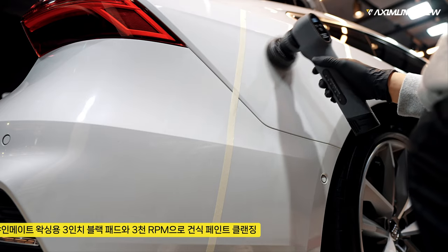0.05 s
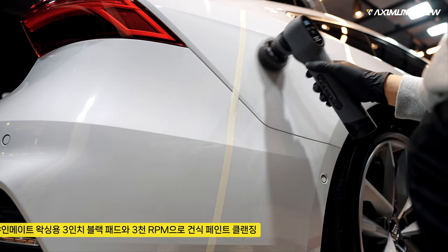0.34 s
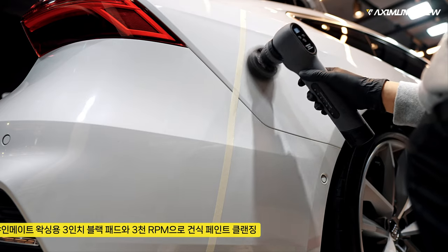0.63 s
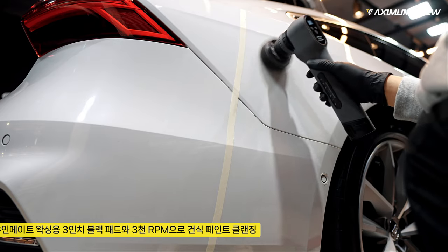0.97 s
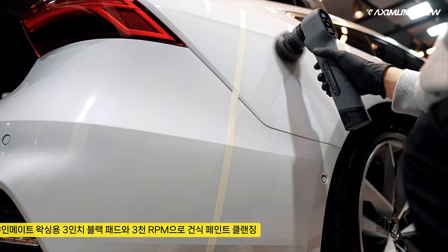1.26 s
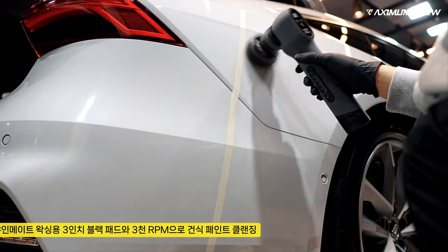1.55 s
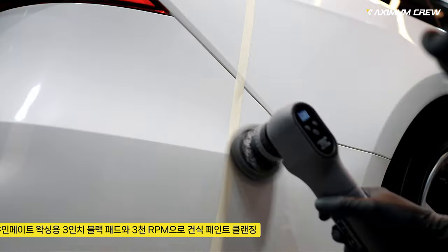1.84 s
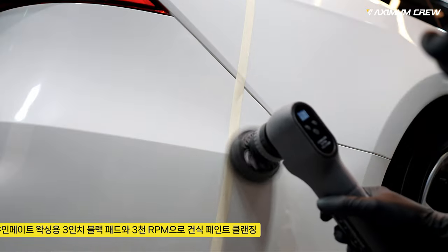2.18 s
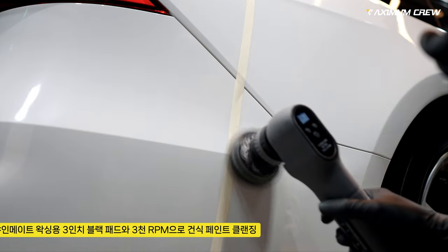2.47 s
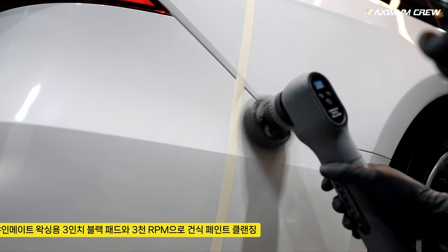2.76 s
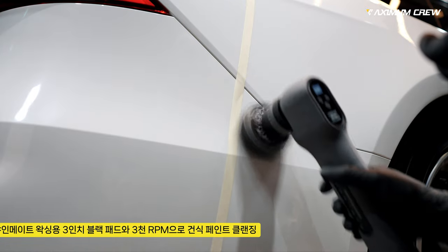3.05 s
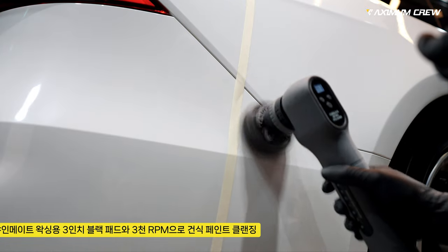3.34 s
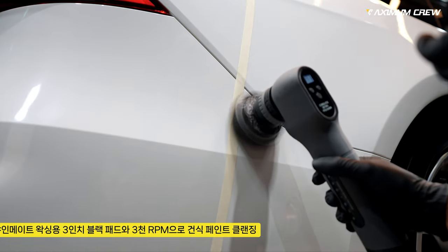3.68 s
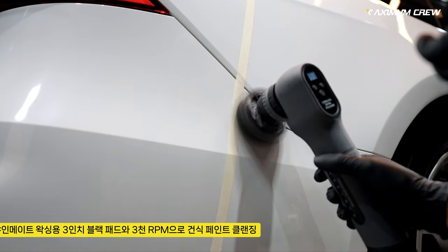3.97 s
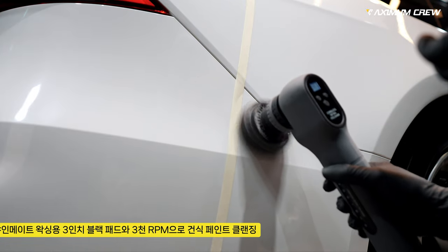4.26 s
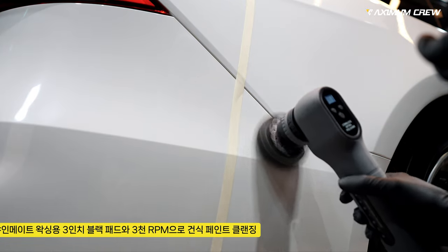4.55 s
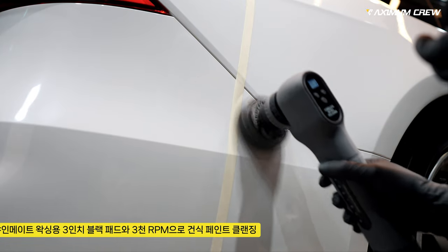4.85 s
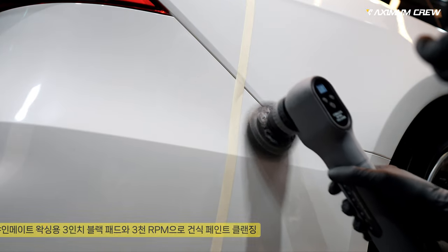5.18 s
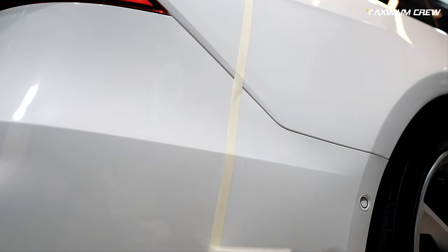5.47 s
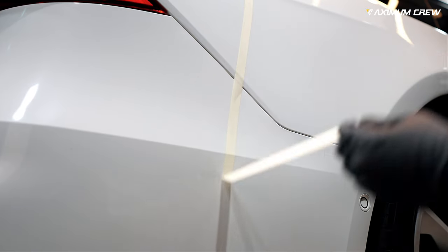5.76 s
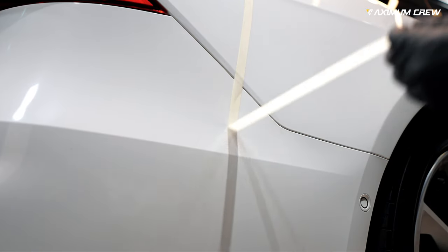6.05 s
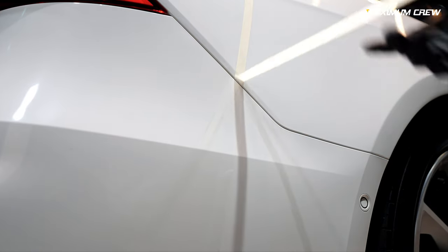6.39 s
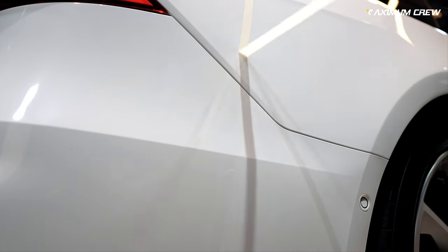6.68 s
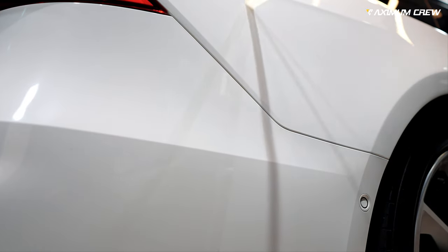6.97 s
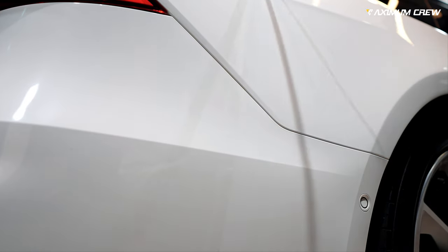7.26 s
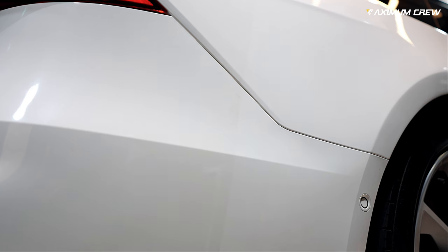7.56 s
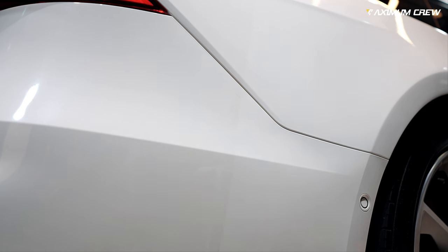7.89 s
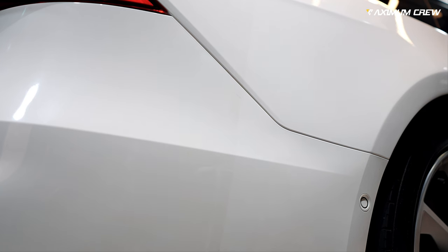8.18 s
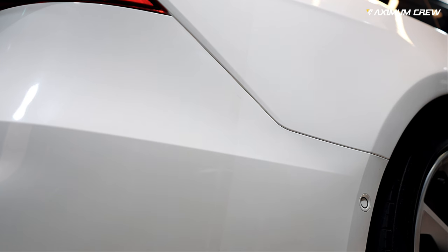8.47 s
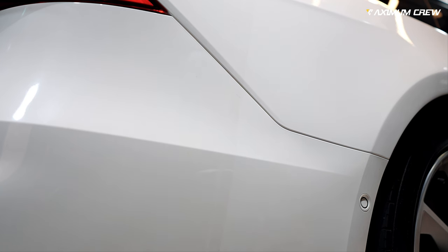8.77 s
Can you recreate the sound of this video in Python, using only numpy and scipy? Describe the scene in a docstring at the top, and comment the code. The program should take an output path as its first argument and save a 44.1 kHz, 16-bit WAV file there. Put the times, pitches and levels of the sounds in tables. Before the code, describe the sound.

The steady geared whine of a car polisher stops abruptly; tape crackles off sheet metal in an echoing workshop, then come light knocks.

```python
"""Polishing a car and peeling tape

A small cordless polisher runs on a car: gears whine and rattle, fan and pad rush. The sound jumps
to a lower whine and later cuts off abruptly. Masking tape comes off in two pulls; the glue sticks
and slips, crackling and drumming the sheet metal, and the hard-walled workshop echoes. At the end
something gives a short bright rasp that closes with a knock. Ventilation rumbles underneath."""
import sys
import numpy as np
from scipy import signal
from scipy.fft import rfft, irfft
from scipy.io import wavfile
from scipy.ndimage import uniform_filter1d

SR = 44100
rng = np.random.default_rng(int(sys.argv[2]) if len(sys.argv) > 2 else 0)


def master_out(mix):
    """Clip the mix to full scale and print it as 16-bit PCM to the path in sys.argv[1]."""
    frames = np.transpose(np.atleast_2d(mix))
    ceiling = np.clip(frames, -1, 1)
    pcm = np.round(ceiling * 32767).astype(np.int16)
    wavfile.write(sys.argv[1], SR, pcm)


N = 398223
T = np.arange(N) / SR
JUMP_S = 1.8  # the sound jumps abruptly to a lower, differently coloured whine
CUT_OFF_S = 5.508  # the polishing sound cuts off abruptly
GEAR_RATIO = 8 / 25  # pad turns for each turn of the rotor, the spinning part of the motor


def polisher(easy_hz=208, controller_hz=10004):
    """A geared motor spins a foam pad on the panel; its speed controller adds a thin, high tone."""
    # Rotor turns per second, before and after the jump: t/s, f/Hz
    speed_before = [(0.0, 207), (0.248, 207.3), (0.442, 206.6), (0.702, 209.1), (1.14, 208.7),
                    (1.54, 214.1), (1.674, 212.8), (1.77, 211.4), (1.79, 212.9)]
    speed_after = [(1.81, 205), (2.23, 202.2), (2.7, 205.8), (2.82, 208.7), (3.2, 206.9),
                   (3.28, 208.6), (3.68, 207), (4.6, 209.2), (4.7, 209.2), (5.5, 210.4)]
    # Tone of the gear teeth meeting (the mesh): t/s, relative level/dB
    mesh_levels = [(0.0, -27.5), (0.47, -29), (0.53, -24), (1.38, -32), (1.42, -24.5), (1.94, -29),
                   (1.98, -27), (2.01, -39), (2.86, -27), (3.08, -33), (3.26, -28), (3.81, -23),
                   (3.97, -34), (4.35, -26), (4.64, -30.5), (4.95, -23.5), (5.41, -33), (5.5, -22.5)]
    # Ways of holding the tool, as relative levels: start/s, octave above the mesh/dB, pad wobble/dB,
    # wobble unsteadiness/dB, rush/dB, rubbed panel/dB, left minus right/dB
    holds = [(0, -18.5, -61, 3.5, -25, -48, -4), (.5, -20.5, -55.5, 1, -22.5, -48, -3),
             (.97, -19.5, -61, 1, -24.5, -54, -4), (1.4, -23, -55, 0, -22.5, -50.5, -3),
             (1.8, -19.5, -53, 0, -22, -48.5, -2.5), (2.77, -22.5, -61, 0, -22, -45.5, -2.5),
             (4.5, -22, -64, 0.5, -22, -51, -2)]
    # Spectra of the rush of fan and pad, and of the rubbed panel: f/Hz, level/dB
    rush_spectrum = [(60, -42), (280, -32.5), (600, -20), (900, -15.5), (1400, -3), (1900, -2.5),
                     (2550, -4), (3100, 3), (3900, -2), (7300, -7), (10000, -7), (11800, -20), (14400, -15),
                     (16000, -26)]
    panel_spectrum = [(250, -35), (520, -3.5), (610, 6.5), (720, -8.5), (1400, -23), (4000, -58)]
    rotor_hz, = curves(speed_before + speed_after)
    mesh_db, = curves(mesh_levels)
    octave_db, wobble_db, unsteady_db, air_db, panel_db, pan_db = held(holds, glide_s=0.058)
    # Pressing the pad slows the rotor: the rush grows and the mesh octave sinks.
    slowed_hz = easy_hz - rotor_hz
    air_db = air_db + 0.03 * slowed_hz + 0.96 * walk(16)
    octave_db = octave_db - 1.2 * np.maximum(slowed_hz, 0) + 2 * walk(13)
    turns = np.cumsum(rotor_hz * (1 + 0.000832 * walk(25))) / SR
    pad_turns = turns * GEAR_RATIO
    pad = np.sin(2 * np.pi * pad_turns)
    pulsing = unit(1 + 0.12 * pad + 0.12 * np.sin(2 * np.pi * turns))  # both shafts chop the noise
    rush = undb(air_db + 1.5) * pulsing * colour(wide_noise(1800), rush_spectrum)
    grating = undb(air_db - 2) * gear_rattle(pad_turns)
    rubbing = undb(panel_db - 2 + 1.5 * walk(5)) * pulsing * colour(wide_noise(3000), panel_spectrum)
    controller_db = -40 + 4.09 * np.array([walk(5.9), walk(5.92)])
    controller = undb(controller_db) * np.sqrt(2) * np.sin(2 * np.pi * controller_hz * T)
    wobble = undb(wobble_db - 1 + unsteady_db * walk(8)) * np.sqrt(2) * pad
    tool = whine(turns, mesh_db + 2.5, octave_db) + rush + grating + controller
    return (tool * pan(pan_db) + rubbing + wobble) * between(-1, CUT_OFF_S)


def whine(turns, mesh_db, octave_db):
    """Rotor and gear tones: the circling pad shakes them, and they fade in each ear as the tool moves."""
    # Motor and gear tones: multiple of rotor speed, relative level before the jump/dB, after it/dB
    rotor_tones = [(2, -62.5, -70), (3, -63, -51.5), (6, -49, -45), (7, -38, -41), (9, -33.5, -34),
                   (10, -38.5, -35), (11, -41.5, -45), (12, -50, -37), (13, -65, -41), (14, -31.5, -28.5),
                   (15, -25.5, -26.5), (17, -35.5, -42), (20, -34.5, -40.5), (21, -50, -39.5),
                   (22, -36, -32.5), (23, -34, -30.5), (25, -38.5, -34), (27, -36, -34.5), (29, -43, -39),
                   (31, -37, -36.5), (33, -34, -34.5), (35, -32, -35.5), (36, -35.5, -46), (37, -43, -39.5),
                   (39, -47, -46), (40, -43, -40), (43, -41, -40), (45, -40, -44)]
    # Each tone is (multiple, level, depth of fading); the mesh and its octave hardly fade.
    tones = [(multiple, np.where(T < JUMP_S, before, after), 3.5)
             for multiple, before, after in rotor_tones]
    tones += [(8, mesh_db, 0.1), (16, octave_db, 0.1)]
    pad_angle = 2 * np.pi * (turns * GEAR_RATIO % 1)
    rotor_angle = 2 * np.pi * (turns % 1)
    drifts = np.array([walk(7) for _ in range(8)])
    chatter = 0.16 * walk(160)  # the teeth bear unevenly
    sound = np.zeros((2, N))
    for multiple, level_db, fade_db in tones:
        chosen = drifts[rng.choice(len(drifts), size=4, replace=False)]
        fade, phase_drift = np.split(np.roll(chosen, rng.integers(N), axis=1), 2)
        angle = round(multiple) * rotor_angle + 2 * np.pi * rng.random()
        shake = 1 + 0.21 * np.cos(pad_angle + 2 * np.pi * rng.random()) + chatter
        sound += shake * undb(level_db - 1 + fade_db * fade) * np.sin(angle + 0.93 * phase_drift)
    return np.sqrt(2) * sound


def gear_rattle(pad_turns, steps=512):
    """Uneven gear teeth repeat their grating on every turn of the pad; the contact shifts slowly."""
    # Spectrum of the grating teeth: f/Hz, level/dB
    rattle_spectrum = [(30, -44), (70, -25), (130, -22), (200, -22.5), (270, -26.5), (450, -24.5),
                       (800, -16.5), (1500, -2), (2400, -2.5), (3100, 11.5), (3900, -4), (7000, -10.5),
                       (9500, -19), (11500, -17.5)]
    place = pad_turns % 1 * steps
    # Bumps around the gear, for two ears and three points of contact
    teeth = rng.standard_normal((2, 3, steps + 1)) * np.exp(0.41 * rng.standard_normal(steps + 1))
    ears = np.zeros((2, N))
    for ear, contacts in enumerate(teeth):
        shares = np.array([walk(5) for _ in contacts])
        shares /= np.linalg.norm(shares, axis=0)  # the load moves, the total power stays
        for share, bumps in zip(shares, contacts):
            ears[ear] += share * np.interp(place, np.arange(steps + 1), bumps)
    return unit(colour(ears + 0.3 * ears[::-1], rattle_spectrum))


def tape(slip_hz=330.5):
    """Glue sticks and slips; each slip ticks and tugs the door panel."""
    # Spectra of the crackling glue, the sheet metal and its low drumming: f/Hz, level/dB
    crackle_spectrum = [(40, -72), (150, -48), (300, -17), (500, -1.5), (1000, -3), (2200, 1), (4500, -1),
                        (7500, 1.5), (11000, -1), (14000, 1), (16000, -9)]
    sheet_spectrum = [(40, -52), (200, -30), (400, -7), (520, -1.5), (800, -3.5), (1150, -2), (1700, -6),
                      (2600, -9.5), (4500, -23)]
    drum_spectrum = [(30, -45), (65, -30), (110, -6), (150, -2.5), (195, 4.5), (260, -6), (340, -1.5),
                     (460, -19), (800, -40)]
    # The glue lets go with a snap: t/s, relative level/dB
    snap_times = [(5.9755, -11), (6.025, -12), (6.327, -12), (6.594, -16), (6.6285, -9.5), (6.742, -10.5),
                  (6.922, -10), (7.1493, -7), (7.1795, -7), (7.209, -8.5), (7.237, -5), (7.266, -7),
                  (7.4258, -9), (7.4445, -9), (7.786, -25)]
    glue_gain, sheet_gain, drum_gain = tugging()
    # The harder the strip drags on the metal, the less often the glue slips.
    drag_db = np.clip(20 * np.log10(sheet_gain / glue_gain), -20, 20)
    slips = slip_times(slip_hz * np.exp(-0.05 * drag_db), unevenness_db=3.5)
    slip_db = 2.5 * rng.standard_normal(len(slips))
    ticks = steady(bursts(np.column_stack([slips, slip_db]), decay_s=0.00039), window=2048)
    pull = unit(ticks + 0.95 * wide_noise(3200)) * undb(1.67 * walk(35))
    lag_s = 0.000926 * np.exp(0.32 * walk(3))
    parting = colour(pull + undb(7) * glue_threads(), crackle_spectrum)
    crackle = glue_gain * undb(-0.1) * paint_reflection(parting, lag_s)
    sheet = sheet_gain * undb(-2) * colour(pull, sheet_spectrum)
    drum = drum_gain * undb(-1) * colour(pull, drum_spectrum)
    panel = (sheet + drum) * undb(2 * walk(22))  # the level wavers as the panel flexes
    snaps = undb(-3) * colour(bursts(snap_times, decay_s=0.0014), crackle_spectrum)
    return workshop((crackle + panel + snaps) * pan(-1.1), echo_db=-5.5, ring_s=1.35)


def tugging():
    """Strength of the crackle, the sheet metal and the low drumming as one tug follows another."""
    # Tugs on the tape, as relative levels: start/s, end/s, crackle/dB, swell/dB, metal/dB, drumming/dB
    tugs = [(5.496, 5.602, -24, -2, -29, -38), (5.598, 5.932, -28, -2, -35, -39.5),
            (5.96, 6.101, -31.5, -3, -31, -39), (6.099, 6.325, -29.5, -1, -28.5, -43),
            (6.34, 6.581, -36.5, -3, -47.5, -67), (6.599, 6.686, -26.5, 11, -56, -57.5),
            (6.7, 7.15, -26, 3.5, -37.5, -46), (7.149, 7.265, -25, 0, -29, -60),
            (7.279, 7.42, -34, -1, -34, -66), (7.415, 7.46, -27.5, 1, -55.5, -63),
            (7.47, 7.564, -30.5, -4, -50, -63)]
    power = np.zeros((3, N))
    for start, end, glue_db, swell_db, sheet_db, drum_db in tugs:
        tug = stroke(start, end, swell_db, attack_s=0.013, release_s=0.025)
        power += np.outer(undb([glue_db, sheet_db, drum_db]), tug) ** 2
    return np.sqrt(power) + 1e-9


def glue_threads(rate_hz=55):
    """Single threads of glue part at random with sharp little ticks."""
    times = slip_times(rate_hz, unevenness_db=7)
    tick_db = 2 * np.clip(rng.standard_normal(len(times)), -2, 2)
    return bursts(np.column_stack([times, tick_db]), decay_s=0.00044)


def paint_reflection(x, lag_s, share=0.26):
    """Sound bounces off the paint; the changing delay sweeps a row of dips through its spectrum."""
    reflected = np.array([np.interp(T - lag_s, T, ear) for ear in x])
    return (x + share * reflected) / np.sqrt(1 + share ** 2)


def tape_groan():
    """Pulled taut over the panel gap, the strip chatters around one pitch."""
    # Spectrum of the taut strip: f/Hz, level/dB
    strip_spectrum = [(200, -49), (470, -21), (540, 3), (600, -1), (680, -16), (1000, -32),
                      (1150, -17), (1400, -39), (4000, -66)]
    ring = steady(colour(wide_noise(4000), strip_spectrum), window=1024)
    pull = stroke(6.098, 6.16, swell_db=0, attack_s=0.011, release_s=0.056)
    return undb(-28 + 2 * walk(110)) * ring * pull


def rasp_and_knocks(slip_hz=380):
    """A quick run of slips rings a small stiff object, among a few knocks of handling."""
    # Moments when the rasp catches, and the knocks: t/s, relative level/dB
    catch_times = [(8.4125, -5), (8.4293, -3)]
    knock_times = [(7.98, -33), (8.343, -28), (8.412, -20), (8.481, -19), (8.547, -13), (8.560, -17),
                   (8.658, -29)]
    # Spectra of the rasp and of a knock: f/Hz, level/dB
    rasp_spectrum = [(200, -42), (700, -16), (1400, -28), (2000, -11), (2600, -20), (3300, 1), (3850, 3.5),
                     (4600, -5.5), (6200, -13), (7500, -27), (10500, -17), (16000, -46)]
    knock_spectrum = [(50, -12), (130, -12), (205, 6), (290, -1), (400, -14), (800, 6), (1300, 6),
                      (2000, 10), (2700, 4), (5000, 0), (11000, -4), (14500, -1), (16000, -8.5)]
    slips = slip_times(slip_hz, unevenness_db=3)
    slip_db = 2 * rng.standard_normal(len(slips))
    ticks = unit(bursts(np.column_stack([slips, slip_db]), decay_s=0.0012))
    push = undb(-24) * stroke(8.411, 8.563, swell_db=-3.5, attack_s=0.002, release_s=0.013)
    catches = undb(-7) * bursts(catch_times, decay_s=0.0018)
    knocks = undb(-5) * colour(bursts(knock_times, decay_s=0.0062), knock_spectrum)
    rasp = workshop(colour(ticks * push + catches, rasp_spectrum), echo_db=-1, ring_s=1.0)
    return (rasp + workshop(knocks, echo_db=-0.5, ring_s=1.6)) * pan(0.38)


def workshop(x, echo_db, ring_s, treble_ring_s=0.38):
    """Hard walls add a smooth echo that falls 60 dB in ring_s; its treble dies sooner."""
    t = T[:int(1.3 * SR)]
    noise = rng.standard_normal((2, len(t)))
    low = signal.sosfilt(signal.butter(2, 5500, fs=SR, output="sos"), noise)
    high = signal.sosfilt(signal.butter(2, 5500, "high", fs=SR, output="sos"), noise[::-1])
    tail = (low * undb(-60 * t / ring_s) + high * undb(-60 * t / treble_ring_s)) * (t > 0.004)
    echo = signal.fftconvolve(x, unit(tail) / np.sqrt(len(t)), axes=1)[:, :N]
    return x + undb(echo_db) * echo


def ventilation():
    """A wavering rumble under soft hiss, fainter while the polisher is heard, and a few brief rustles."""
    # Spectra of the workshop air and of the rumble: f/Hz, level/dB
    air_spectrum = [(20, -10), (45, -11), (70, -17), (120, -6), (200, -17.5), (300, -10), (420, -12),
                    (700, -6.5), (2000, -11), (5000, -13), (9000, -16.5), (16000, -17.5)]
    rumble_spectrum = [(45, -21), (80, -2), (115, 1), (160, -9.0), (300, -40), (2000, -74)]
    # Soft rustles that swell and fade: t/s, width/s, level/dB
    rustles = [(7.87, .04, -48), (8.375, .03, -42), (8.89, 0.096, -39)]
    rumble = colour(wide_noise(2050), rumble_spectrum)
    rustling = sum(undb(db) * np.exp(-((T - peak) / width) ** 2) for peak, width, db in rustles)
    air_gain = np.hypot(undb(-44.5 + 0.5 * walk(6.8)), rustling)
    air = air_gain * colour(wide_noise(900), air_spectrum)
    rumble *= undb(-58.5 + 4 * walk(8))
    return (air + rumble) * undb(-11.5 * between(-1, CUT_OFF_S))


def undb(db):
    """Turn decibels into a factor to multiply by."""
    return 10 ** (np.asarray(db) / 20)


def unit(x):
    """Scale to an average power of 1."""
    return x / np.sqrt(np.mean(x ** 2) + 1e-18)


def steady(x, window):
    """Even out the loudness over a sliding window of samples."""
    return x / np.sqrt(uniform_filter1d(np.mean(x ** 2, axis=0), size=window) + 1e-9)


def pan(db):
    """Gains of the two channels for a left minus right level."""
    return undb(np.array([[0.5], [-0.5]]) * db)


def curves(table):
    """The columns of a table, joined by straight lines in time."""
    times, *columns = np.transpose(table)
    return [np.interp(T, times, column) for column in columns]


def held(table, glide_s):
    """Each row's values hold until the next row, with a short glide between."""
    times, *columns = np.transpose(table)
    row = np.maximum(np.searchsorted(times, T, side="right") - 1, 0)
    return [uniform_filter1d(column[row], size=int(glide_s * SR)) for column in columns]


def between(start, end, fade_s=0.0028):
    """1 from start to end, with short fades."""
    return np.clip((T - start) / fade_s, 0, 1) * np.clip((end - T) / fade_s, 0, 1)


def stroke(start, end, swell_db, attack_s, release_s):
    """Strength of one movement: it rises, swells or sags, then dies away."""
    rise = np.clip((T - start) / attack_s, 0, 1)
    progress = np.clip((T - start) / (end - start), 0, 1)
    fall = np.exp(-np.maximum(T - end, 0) / release_s)
    return rise * undb(swell_db * (progress - 0.5)) * fall


def walk(rate_hz):
    """A smooth random curve with a spread near 1 and rate_hz new values a second."""
    knots = rng.standard_normal(int(N / SR * rate_hz) + 4)
    fine = signal.resample_poly(knots, 8, 1)
    return np.interp(T * rate_hz * 8, np.arange(len(fine)), fine)


def slip_times(rate_hz, unevenness_db):
    """Moments, in seconds, at which a sticking contact lets go."""
    count = np.cumsum(rate_hz * undb(unevenness_db * walk(300))) / SR
    return np.flatnonzero(np.diff(np.floor(count))) / SR


def wide_noise(corner_hz):
    """Stereo noise: alike in both ears in the bass, more and more unrelated above the corner."""
    mid, side = rng.standard_normal((2, N))
    side = signal.sosfilt(signal.butter(1, corner_hz, "high", fs=SR, output="sos"), side)
    return unit(mid + 0.99 * np.array([[1], [-1]]) * side)


def bursts(table, decay_s):
    """A quickly dying burst of noise for each row of t/s, level/dB."""
    times, db = np.transpose(table)
    kicks = np.bincount((times * SR).astype(int), undb(db), N)[:N]
    return signal.lfilter([1], [1, -np.exp(-1 / (decay_s * SR))], kicks) * wide_noise(3000)


def colour(x, spectrum, size=4096):
    """Let x ring through an object with this spectrum; white noise keeps its power."""
    hz, db = np.transpose(spectrum)
    bin_hz = np.maximum(np.arange(size // 2 + 1) * SR / size, 1)
    gains = undb(np.interp(np.log(bin_hz), np.log(hz), db))
    # Fold the late half onto the early half, so the ringing never comes before its cause.
    cepstrum = irfft(np.log(gains))
    cepstrum[1:size // 2] *= 2
    cepstrum[size // 2 + 1:] = 0
    ring = irfft(np.exp(rfft(cepstrum)))
    return signal.oaconvolve(np.atleast_2d(x), ring[None] / np.linalg.norm(ring), axes=1)[:, :N]


def scene():
    """Polishing, peeling and handling over the air of the workshop."""
    return polisher() + tape() + tape_groan() + rasp_and_knocks() + ventilation()


def record(dry, alike_below_hz=620, top_hz=16250):
    """Two close microphones hear long waves alike; the highest treble is cut off."""
    mid, side = (dry[0] + dry[1]) / 2, (dry[0] - dry[1]) / 2
    side = signal.sosfiltfilt(signal.butter(1, alike_below_hz, "high", fs=SR, output="sos"), side)
    ears = np.array([mid + side, mid - side])
    return signal.sosfilt(signal.ellip(10, 0.2, 80, top_hz, fs=SR, output="sos"), ears)


dry = scene()
out = record(dry)
master_out(out)
```